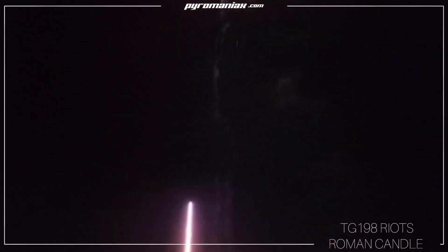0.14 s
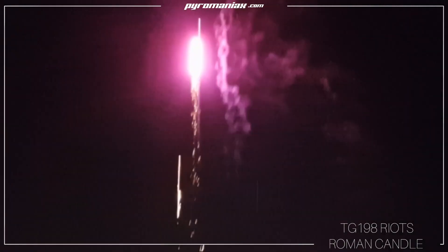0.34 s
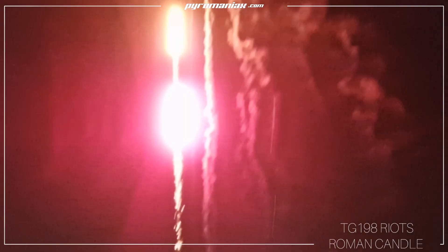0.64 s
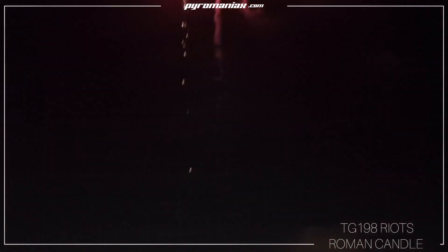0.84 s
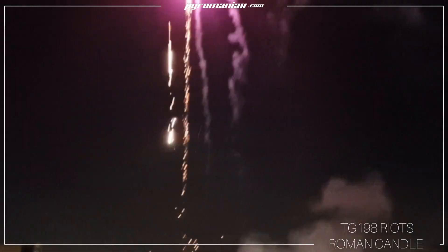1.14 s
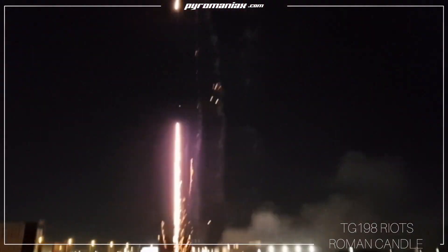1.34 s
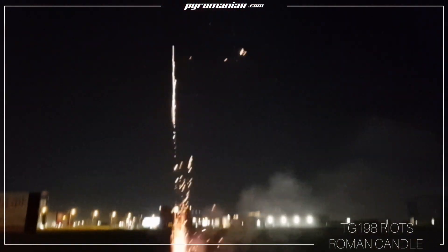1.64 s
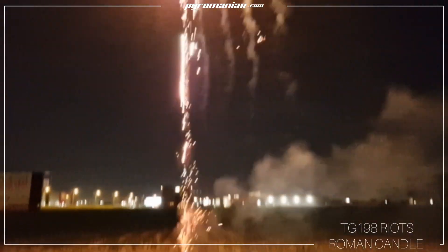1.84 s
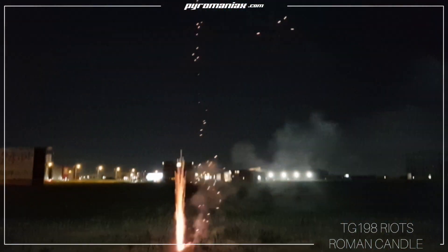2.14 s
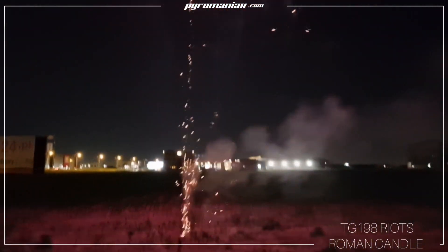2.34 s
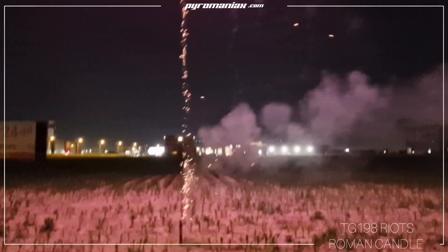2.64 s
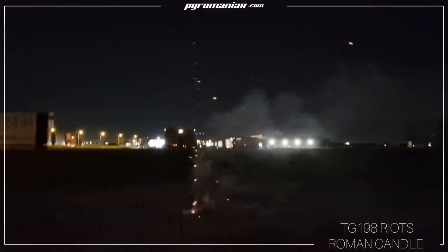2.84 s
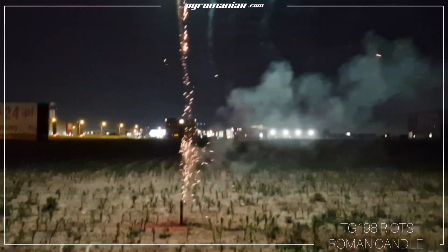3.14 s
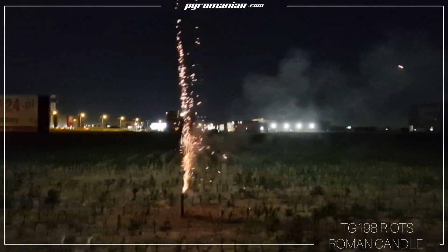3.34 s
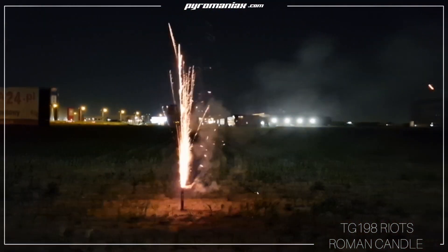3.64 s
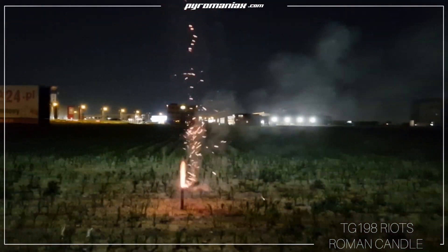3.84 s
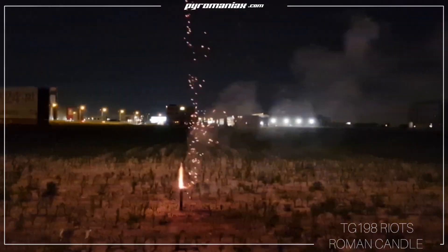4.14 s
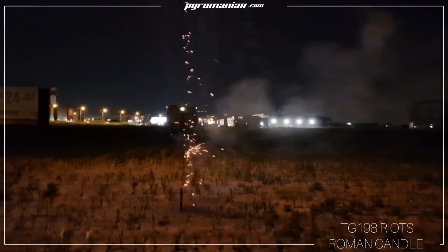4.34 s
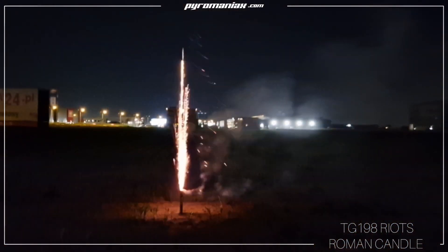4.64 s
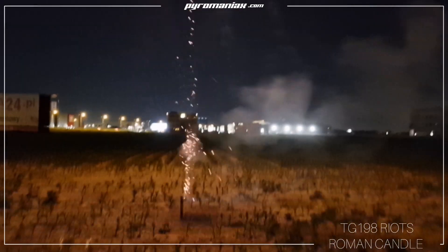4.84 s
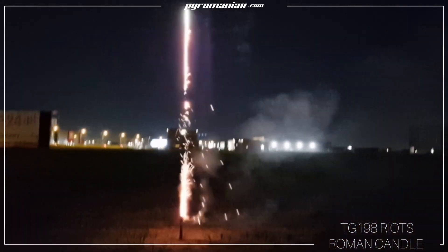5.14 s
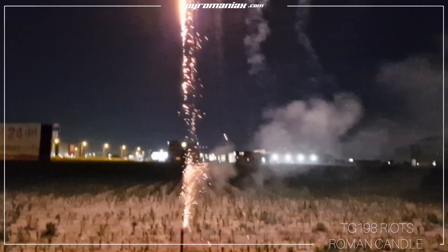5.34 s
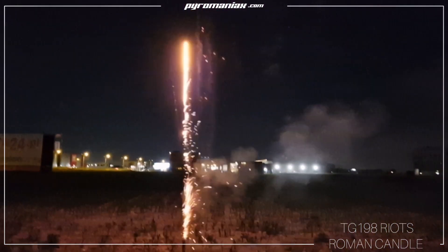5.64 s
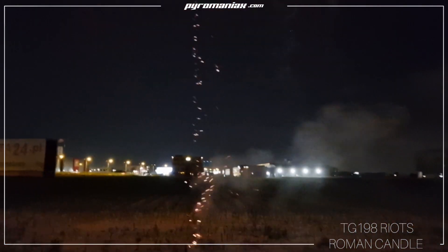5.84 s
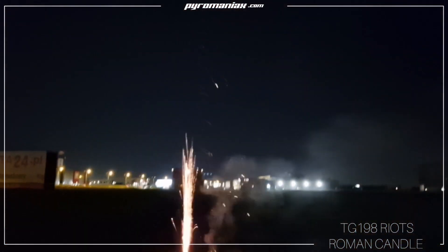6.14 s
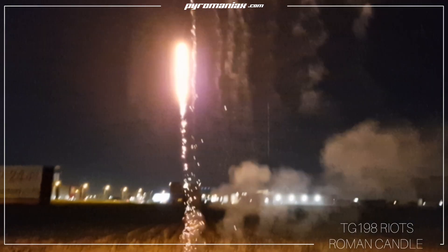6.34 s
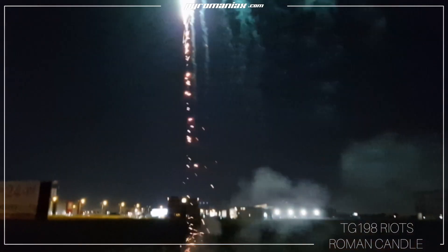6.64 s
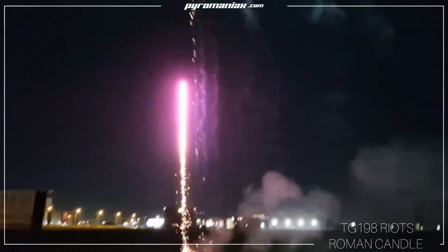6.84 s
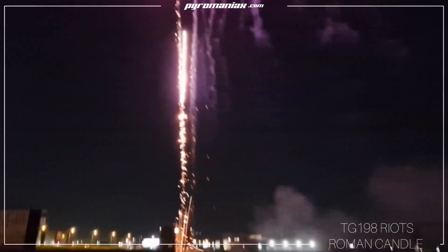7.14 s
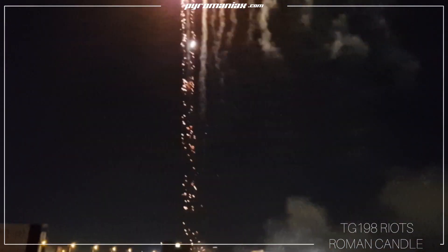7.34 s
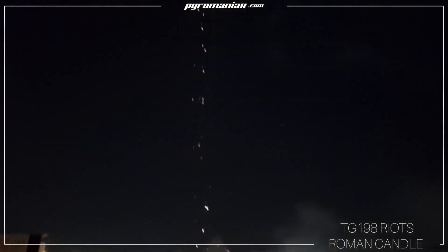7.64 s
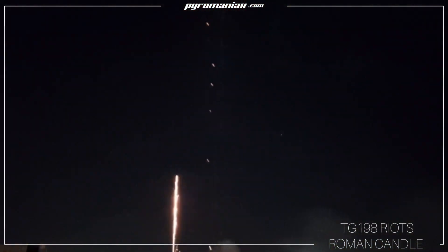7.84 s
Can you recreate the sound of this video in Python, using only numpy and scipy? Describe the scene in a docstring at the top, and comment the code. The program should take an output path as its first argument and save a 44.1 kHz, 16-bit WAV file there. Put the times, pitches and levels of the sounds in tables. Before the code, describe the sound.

Rapid, irregular firework launches thump and spit throughout, heard in stereo from nearby in an open field. Each leaves a soft, fading hiss as it climbs. Bright cracks overhead are the loudest sounds and stop about halfway through, while the shots keep coming. Underneath are tiny spark pops, a couple of soft faraway thuds and a slowly swelling hum of distant traffic.

```python
"""A many-barrelled roman candle fires in an open field at night, close to a hand-held stereo camera.
Each lift charge thumps and spits gas from its barrel, and its star fizzes away as it climbs.
Some stars burst overhead with a crack that bounces off the ground and scatters over the stubble.
Sparks pop faintly; far off, traffic hums and rumbles and a few soft thuds sound.
The two microphones sit behind ports that colour them, and overload softly on the loudest peaks."""
import sys
import numpy as np
from scipy import signal
from scipy.io import wavfile
from scipy.ndimage import uniform_filter1d

SR = 44100
rng = np.random.default_rng(int(sys.argv[2]) if len(sys.argv) > 2 else 0)


def persist_wave(psi):
    """Save psi, clipped to +-1, as 16-bit WAV."""
    counts = np.round(np.clip(psi, -1, 1) * 32767).astype(np.int16)
    wavfile.write(sys.argv[1], SR, np.atleast_2d(counts).T)


N = 352800

# far traffic, swelling as it nears: (time [s], rumble level [dB], hum level [dB])
TRAFFIC_LEVELS = [(0, -47, -47), (1, -46, -50.5), (1.8, -43.5, -48), (2.6, -46, -50.5), (3.9, -45, -51.5),
                  (5.3, -41.5, -48), (6, -42.5, -48), (7.2, -37.5, -45), (8, -39, -46)]
# low rumble of the traffic: (frequency [Hz], level [dB])
RUMBLE_SPECTRUM = [(15, -42), (25, -25), (70, 2.5), (103, -13.5), (134, -14), (337, -29), (380, -22),
                   (450, -42), (580, -63), (990, -120)]
# hum of far tyres: (frequency [Hz], level [dB])
TYRE_SPECTRUM = [(150, 2), (400, -12), (700, 1.5), (1100, -0.5), (1700, -0.5), (2500, -14), (4000, -30),
                 (8000, -45), (10000, -56), (16000, -67)]
# likeness of diffuse noise at the two microphones: (frequency [Hz], coherence [0-1])
MIC_COHERENCE = [(60, 1), (200, 0.96), (600, 0.28), (1500, 0.15), (5000, 0.044)]
# soft low thuds from afar: (time [s], level [dB])
FAR_THUDS = [(4.512, -32.5), (7.496, -29), (7.513, -35)]
# faint pops from the sparks: (time [s], level [dB], pitch [Hz])
SPARK_POPS = [(0.8175, -38, 1900), (0.918, -42, 2400), (0.9943, -30, 2300), (1.6153, -40, 5000),
              (2.0253, -38, 1700), (2.939, -38, 1700), (2.9664, -48, 6000), (3.204, -45, 4500),
              (3.619, -35, 1250), (3.6632, -32, 1700), (3.9065, -47, 5000), (3.9174, -47, 5000),
              (4.4387, -36, 2200), (4.6123, -42, 4200), (4.620, -45, 3200), (4.8931, -37, 1400),
              (5.069, -29, 2000), (6.0975, -45, 3500)]
# a burning star: (frequency [Hz], level [dB])
FIZZ_SPECTRUM = [(500, -1), (2000, 3.5), (4000, 2), (6000, -3), (8000, 0.5), (11000, -2), (16000, 5)]
# fading of a climbing star: (frequency [Hz], time to fall 9 dB [s])
FIZZ_FADE = [(1000, 0.02), (4000, 0.24), (8000, 0.3), (11000, 0.15), (15000, 0.21)]
# stars bursting overhead: (time [s], ground bounce delay [ms], level [dB])
STAR_BURSTS = [(.0304, 10.5, -0.5), (1.2175, 9.95, -0.5), (2.1275, 9.4, 0), (2.562, 9.3, -1),
               (2.6723, 8.93, 0), (3.4744, 9.42, -1), (4.0817, 8.6, -0.5)]
# colour of the ports for sound from above: (frequency [Hz], gain [dB])
OVERHEAD_COLOUR = [(300, -4), (1000, -1), (2200, 1), (4000, -2), (7000, 3), (10500, 23), (13000, 24),
                   (16000, 20)]
# colour of the ground bounce: (frequency [Hz], gain [dB])
GROUND_COLOUR = [(150, -4), (500, 0), (1400, 2), (3000, -1), (7000, 0), (10000, 11), (14000, 17)]
# colour of the field's scatter: (frequency [Hz], gain [dB])
SCATTER_COLOUR = [(200, -13), (500, -1.5), (1500, 0.5), (3500, -3.5), (8000, 0.5), (15000, 15)]
# scatter off stubble and sheds: (frequency [Hz], time to fall 60 dB [s])
SCATTER_DECAY = [(200, 0.13), (500, 0.229), (1400, 0.29), (4000, 0.46), (10000, 0.5)]
# lift charges close by: (time of the pressure trough [s], thump level [dB], jet level [dB])
LIFT_CHARGES = [(0.1493, -15.4, -24.5), (0.2172, -16, -24), (0.3372, -13.5, -25.5), (0.5522, -13.5, -22),
                (0.6087, -17.5, -23.5), (1.0635, -15, -25), (1.0717, -13, -20), (1.409, -11, -20.5),
                (1.667, -13, -19), (1.744, -16.5, -26), (1.7889, -13, -20), (1.8527, -13, -22),
                (2.2623, -14, -20), (2.28, -14, -22), (2.588, -16.5, -23), (2.999, -16, -26),
                (3.1209, -15.5, -22.5), (3.3401, -18, -24.5), (3.3823, -12.5, -19.5), (3.7208, -11, -21),
                (3.7671, -14.5, -22.5), (3.9882, -11.5, -18.5), (4.2802, -12.5, -20), (4.7266, -12.5, -21),
                (4.7995, -11.5, -19.5), (5.188, -10, -19), (5.2763, -11.5, -19), (5.311, -11, -20.5),
                (5.3728, -8, -18.5), (5.5139, -9, -17.5), (5.6907, -9.7, -18.5), (6.2432, -11, -20),
                (6.3587, -17.5, -22), (6.601, -10.5, -20), (6.8928, -11.5, -19), (6.9994, -9.5, -19),
                (7.039, -12.3, -20.5), (7.1519, -10, -17.5), (7.261, -9.2, -18.5), (7.3037, -8.5, -19.5),
                (7.9171, -9.5, -20)]
# air modes of a barrel: (frequency [Hz], level [dB], fade [ms], rise [ms], signed weight [ratio])
BARREL_MODES = [(74, 0, 16, 4.1, -0.99), (193.9, -4.5, 7.57, .1, 0.97)]
# gas jet at the muzzle: (frequency [Hz], level [dB])
JET_SPECTRUM = [(200, -13), (450, 0.5), (800, 8), (2000, 10), (8000, -3), (16000, -1.5)]
# the camera tilts down to the muzzle and up again: (time [s], top treble gain of the jets [dB])
CAMERA_TILT = [(0, 1), (1.5, 1), (2.2, 3.5), (5.8, 4.5), (6.3, 1.5), (8, -0.5)]
# left microphone behind its port: (frequency [Hz], gain [dB])
LEFT_PORT = [(60, 0), (400, 1.8), (900, 3), (2000, 2), (3600, 7.5), (5000, 6), (7300, 11), (8600, 6.5),
             (10500, 0), (14800, 3), (16500, 6)]
# right microphone behind its port: (frequency [Hz], gain [dB])
RIGHT_PORT = [(400, 1), (750, 5.5), (1500, 10.5), (2000, 3), (2700, 8.5), (3700, 9.5), (5000, -13.5),
              (7100, 0), (9500, -15), (14500, -13), (16500, -24)]


def gain_of(db):
    """Decibels to a gain."""
    return 10 ** (np.asarray(db) / 20)


def unit_rms(x):
    """Scales to rms 1."""
    return x / np.sqrt(np.mean(x ** 2) + 1e-20)


def read(points, hz):
    """Reads a table on a log-frequency axis."""
    f, value = np.transpose(points)
    return np.interp(np.log(hz + 1), np.log(f + 1), value)


def add(mix, s, sound, right_late_ms=0.):
    """Mixes a sound into the given channels at s seconds; the right one may lag."""
    for channel, late in zip(mix, (0, right_late_ms / 1000)):
        part = channel[round((s + late) * SR):][:len(sound)]
        part += sound[:len(part)]


def colour(x, points, size=2048):
    """Minimum-phase filter with the given spectrum."""
    log_gain = np.log(gain_of(read(points, abs(np.fft.fftfreq(size, 1 / SR)))))
    taps = np.fft.ifft(np.exp(np.conj(signal.hilbert(log_gain)))).real[:size // 2]
    return signal.oaconvolve(x, taps)[:len(x)]


def diffuse_noise(points, patchy_db, size=1024, shape=None):
    """Noise with drifting patches, partly alike at both microphones; shape(hz, t) is an optional gain."""
    frames, hz = 4 * N // size + 5, np.fft.rfftfreq(size, 1 / SR)
    a, b, c, d, patches = rng.standard_normal((frames, size // 2 + 1, 5)).T
    patches = unit_rms(uniform_filter1d(uniform_filter1d(patches, size=12, axis=0), size=10, axis=1))
    coherence = read(MIC_COHERENCE, hz)[:, None]
    left = a + 1j * b
    right = coherence * left + np.sqrt(1 - coherence ** 2) * (c + 1j * d)
    spectra = np.array([left, right]) * gain_of(read(points, hz)[:, None] + patchy_db * patches)
    if shape:
        spectra *= shape(hz, np.arange(frames) * size / 4 / SR)
    return unit_rms(signal.istft(spectra, nperseg=size, noverlap=3 * size // 4)[1][:, :N])


def shock(width_ms):
    """A shock wave: sudden rise, then suction."""
    u = np.arange(400) / SR * 1000 / width_ms
    return (1 - u) * np.exp(-u) * (1 - np.exp(-(u / 0.37) ** 2)) * 2.06


def edge_echoes(pulse, db, fade_ms):
    """A pulse followed by small quick echoes off nearby edges."""
    ms = np.arange(300) / SR * 1000
    echoes = gain_of(db) * rng.standard_normal(len(ms)) * np.exp(-ms / fade_ms)
    return np.convolve(pulse, np.r_[1, echoes])


def far_traffic():
    """Traffic in the distance: a lumpy low rumble and the hum of tyres."""
    s, rumble_db, hum_db = np.transpose(TRAFFIC_LEVELS)
    t = np.arange(N) / SR
    rumble = diffuse_noise(RUMBLE_SPECTRUM, patchy_db=0.5, size=2048)
    hum = diffuse_noise(TYRE_SPECTRUM, patchy_db=1.4)
    return gain_of(np.interp(t, s, rumble_db)) * rumble + gain_of(np.interp(t, s, hum_db)) * hum


def far_thuds(hz=64):
    """Soft thuds from afar, each about three swings of a low tone."""
    out, t = np.zeros((2, N)), np.arange(2000) / SR
    for s, db in FAR_THUDS:
        add(out, s, gain_of(db) * np.sin(2 * np.pi * hz * t) * np.hanning(len(t)))
    return out


def spark_pops(fade_cycles=.6):
    """Sparks pop in tiny one-swing clicks with quick echoes."""
    out, t = np.zeros((2, N)), np.arange(200) / SR
    for s, db, hz in SPARK_POPS:
        cycles = hz * t - 1
        click = np.cos(2 * np.pi * cycles) * np.exp(-(cycles / fade_cycles) ** 2)
        add(out, s - 1 / hz, gain_of(db) * edge_echoes(click, db=-21, fade_ms=1.8), right_late_ms=.08)
    return out


def star_fizz():
    """Each burning star fizzes, fading as it climbs away from the microphones."""
    def fading(hz, t):
        power = 0
        for s, _, jet_db in LIFT_CHARGES:
            age = np.maximum(t - s, 0) / read(FIZZ_FADE, hz)[:, None]
            power += gain_of(jet_db) ** 2 * (age > 0) * np.exp(-2 * age ** 1.25)
        return np.sqrt(power)
    return gain_of(-59) * diffuse_noise(FIZZ_SPECTRUM, patchy_db=2.0, size=512, shape=fading)


def field_scatter(x):
    """Stubble and sheds return sparse echoes of random sign, each band dying at its own speed."""
    taps = np.zeros((2, SR // 2))
    at = np.arange(0, SR // 2 - 20, 20) + rng.integers(0, 20, (2, (SR // 2 - 1) // 20))
    strengths = rng.choice([-1., 1.], at.shape) * gain_of(3.5 * rng.standard_normal(at.shape))
    np.put_along_axis(taps, at, strengths, 1)
    hz, t, spectra = signal.stft(taps, SR, nperseg=256)
    decay = gain_of(-60 * t / read(SCATTER_DECAY, hz)[:, None])
    tail = signal.istft(spectra * decay, SR, nperseg=256)[1]
    return signal.fftconvolve(x, tail / np.linalg.norm(tail[0]), axes=1)[:, :N]


def star_bursts(rise_ms=.15, holder_delay_ms=1.85):
    """Cracks from overhead: direct, off the camera's holder (left only), off the ground, then scattered."""
    out, to_field = np.zeros((2, N)), np.zeros((3, 2, N))  # three scatter patterns, taken in turn
    for k, (s, ground_ms, db) in enumerate(STAR_BURSTS):
        start = s - rise_ms / 1000
        crack = gain_of(db) * shock(0.21)
        for mic, lag_s in ((out[:1], 0), (out[1:], .0001)):
            add(mic, start + lag_s, edge_echoes(colour(crack, OVERHEAD_COLOUR), db=-23, fade_ms=1.2))
        add(out[:1], start + holder_delay_ms / 1000, gain_of(db - 5) * shock(0.16))
        bounce = edge_echoes(colour(shock(.23), GROUND_COLOUR), db=-24, fade_ms=2.5)
        add(out, start + ground_ms / 1000, gain_of(db - 1.5) * bounce, right_late_ms=.2)
        add(to_field[k % 3], s + 1.83 * ground_ms / 1000, colour(crack, SCATTER_COLOUR))
    return out + gain_of(-2) * sum(field_scatter(x) for x in to_field)


def barrel_thump(ms):
    """The air in a barrel rings: a quick knock and a slower boom meet in one deep trough."""
    thump = 0
    for hz, db, fade_ms, rise_ms, weight in BARREL_MODES:
        envelope = (1 - np.exp(-(ms / rise_ms) ** 2)) * np.exp(-(ms / fade_ms) ** 2)
        thump += weight * gain_of(db) * np.sin(2 * np.pi * hz * ms / 1000) * envelope
    return thump


def lift_charges(trough_delay_s=.004):
    """The candle, close by: each charge thumps, pops at the muzzle and blows a jet of gas."""
    out, ms = np.zeros((2, N)), np.arange(2600) / SR * 1000
    thump = barrel_thump(ms)
    blow = (1 - np.exp(-(ms / 0.97) ** 2)) / (1 + (ms / 8.02) ** 5)
    afterblow = gain_of(-22.5) / (1 + (ms / 37) ** 8)
    jet_envelope = blow + afterblow
    hiss, right_hiss = (unit_rms(colour(rng.standard_normal(N + len(ms)), JET_SPECTRUM)) for _ in range(2))
    barrels = rng.uniform(size=(len(LIFT_CHARGES), 2))
    for (s, thump_db, jet_db), (depth, bearing) in zip(LIFT_CHARGES, barrels):
        start = s - trough_delay_s
        span = round(start * SR) + np.arange(len(ms))
        ragged_flow = gain_of(2.5 * unit_rms(uniform_filter1d(rng.standard_normal(len(ms)), size=40)))
        gas = ragged_flow * jet_envelope * hiss[span]
        # the jet echoes inside the empty part of its barrel: a hollow colour, new for each shot
        echo_lag = round((.4 + .9 * depth) * SR / 1000)
        gas = signal.lfilter([1], np.r_[1, np.zeros(echo_lag), .35], gas)
        treble_db = np.interp(s, *np.transpose(CAMERA_TILT))
        gas = colour(gas, [(9000, 0), (14000, treble_db)], size=256)
        add(out, start, gain_of(thump_db) * thump)
        add(out, start + 0.0009, gain_of(thump_db - 10) * shock(0.54), right_late_ms=0.098)  # muzzle pop
        add(out, start, gain_of(jet_db) * gas, right_late_ms=.09 + .04 * bearing)
        add(out[1:], start, gain_of(jet_db - 5) * jet_envelope * right_hiss[span])
    return out


def scene():
    """The candle and the field around it, as they reach the camera."""
    return lift_charges() + star_fizz() + star_bursts() + spark_pops() + far_thuds() + far_traffic()


def record(dry):
    """The camera's microphones: port colour, soft overload near full scale, a band limit."""
    heard = np.array([colour(dry[0], LEFT_PORT), colour(dry[1], RIGHT_PORT)])
    heard = heard / (1 + abs(heard / .9) ** 6) ** (1 / 6)
    lowpass = signal.firwin(511, cutoff=15800, window=("kaiser", 9), fs=SR)
    return signal.oaconvolve(heard, lowpass[None], "same")


dry = scene()
out = record(dry)
persist_wave(out)
```